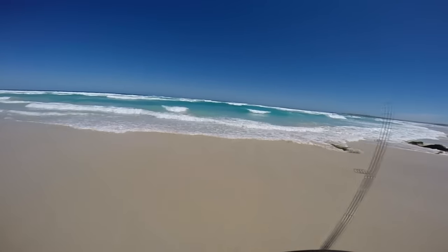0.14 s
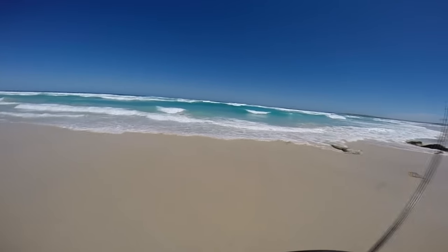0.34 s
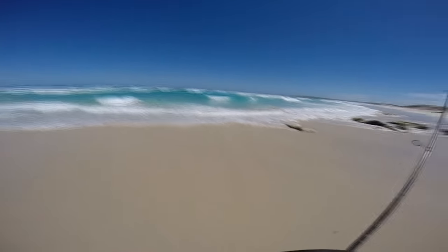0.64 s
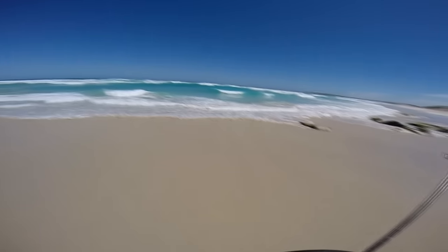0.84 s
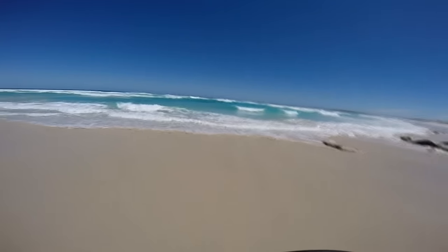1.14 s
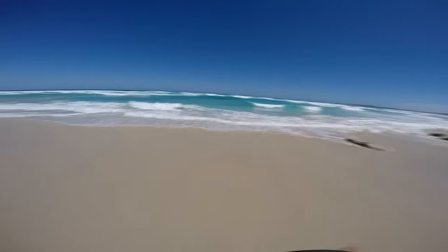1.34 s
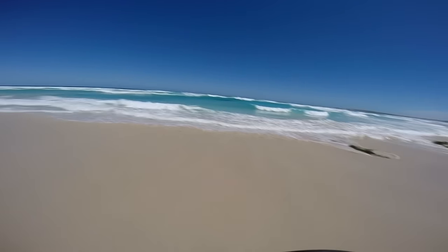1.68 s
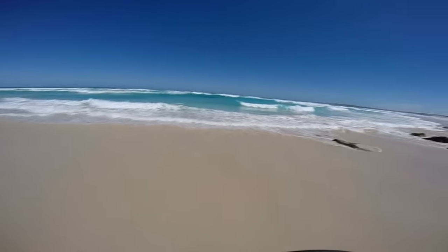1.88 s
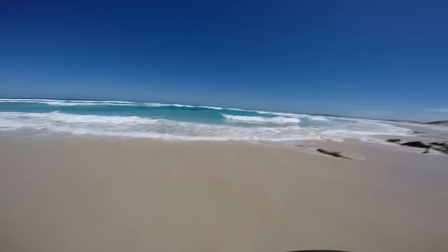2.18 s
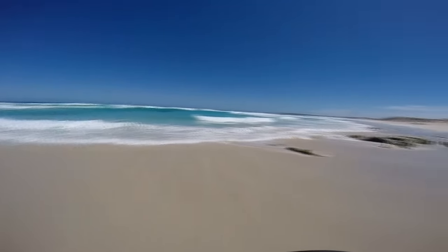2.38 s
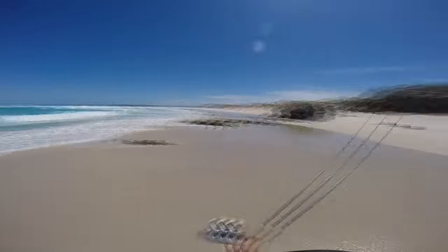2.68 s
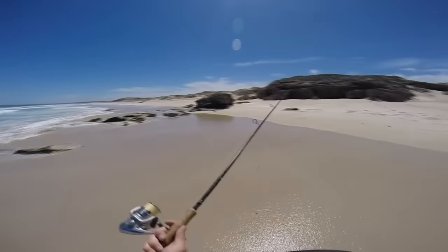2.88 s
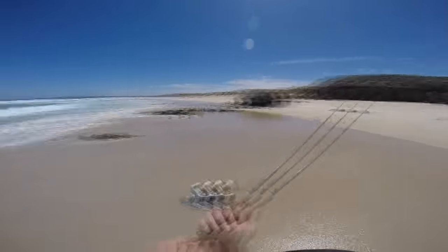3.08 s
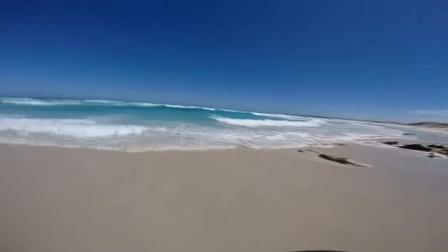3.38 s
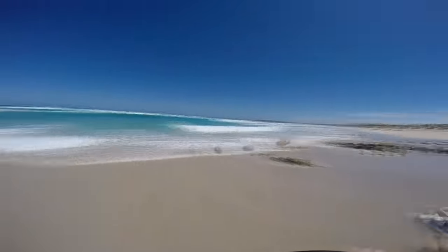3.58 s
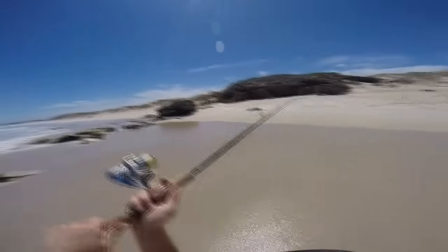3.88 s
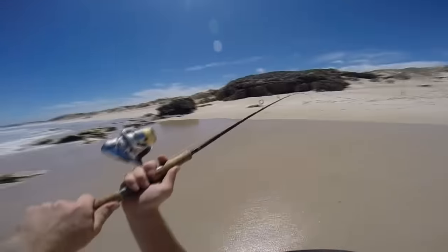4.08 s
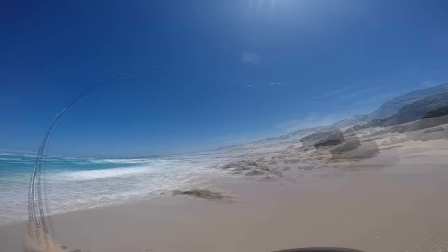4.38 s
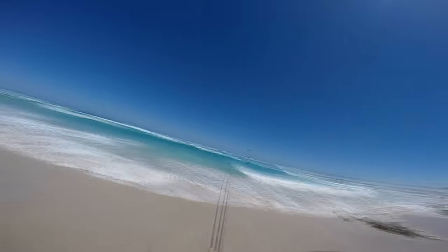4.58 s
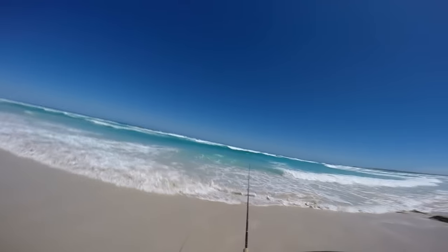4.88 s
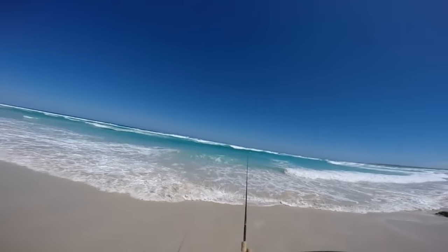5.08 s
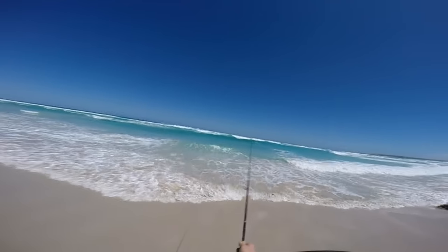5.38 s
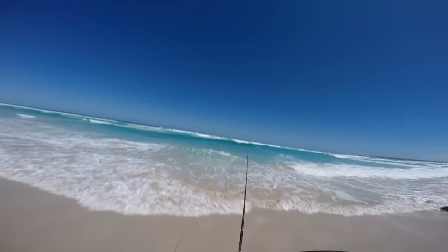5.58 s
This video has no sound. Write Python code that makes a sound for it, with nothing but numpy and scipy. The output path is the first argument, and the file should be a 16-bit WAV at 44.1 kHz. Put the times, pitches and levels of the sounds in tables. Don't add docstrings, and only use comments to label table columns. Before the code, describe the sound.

On an open beach, a head-worn camera in a housing picks up an angler's steps as dull bassy thuds about twice a second, some hard, some soft. Distant surf hisses steadily and faintly. After a quieter gap the rod is cast: a dense burst of deep thumps, hollow housing knocks, a short crackling swish and tiny reel clicks. Surf and light low wind remain.

```python
import sys
import numpy as np
from scipy import signal
from scipy.fft import rfft, irfft, next_fast_len
from scipy.io import wavfile
from scipy.ndimage import uniform_filter1d

SR = 44100
rng = np.random.default_rng(int(sys.argv[2]) if len(sys.argv) > 2 else 0)


def bounce(signal):
    frames = np.transpose(np.atleast_2d(signal))
    limited = np.clip(frames, -1, 1)
    pcm = np.round(limited * 32767).astype(np.int16)
    wavfile.write(sys.argv[1], SR, pcm)


def ratio(d):
    e = np.asarray(d, float) / 20
    return 10 ** e


N = 252604
LOW_CUT_HZ = 20


def colour(x, gain):
    size = next_fast_len(len(x))
    f_hz = np.arange(size // 2 + 1) * SR / size + 1e-3
    return irfft(rfft(x, size) * gain(f_hz), size)[:len(x)]


def unit(x):
    return x / np.sqrt(np.mean(x ** 2))


def band(hz, width_hz, top_hz=20000, grain_db=0):
    grains = rng.standard_normal(N) * ratio(grain_db * rng.exponential(size=N))
    return unit(colour(grains, lambda f: np.exp(-((f - hz) / width_hz) ** 2 * 2) / (1 + (f / top_hz) ** 18)))


def walk(rate_hz):
    hold = int(SR / rate_hz)
    held = np.repeat(rng.standard_normal(N // hold + 1), hold)
    return 1.1 * uniform_filter1d(uniform_filter1d(held, hold), hold)[:N]


def ring(push, hz, t60_s):
    pole = np.exp((2j * np.pi * hz - np.log(1000) / t60_s) / SR)
    return signal.lfilter([1], [1, -pole], push).imag


def add(out, x, start_s, peak_db):
    i = int(start_s * SR)
    out[i:i + len(x)] += (ratio(peak_db) * x / np.max(np.abs(x)))[:N - i]


def jolts(table):
    out, lead_s, bottoms_s = np.zeros(N), 0.04, []
    t = np.arange(SR // 3) / SR - lead_s
    low_cut = signal.butter(3, LOW_CUT_HZ, "high", fs=SR, output="sos")
    for s, db, push_ms, hz, t60_s in table:
        push = np.exp(-(1000 * t / push_ms) ** 2 / 2)
        rock = signal.sosfilt(low_cut, ring(push, hz, t60_s))
        add(out, rock, s - lead_s, db)
        bottoms_s.append(s + t[np.argmin(rock)])
    return out, bottoms_s


def stops(table):
    t, push_ms = np.arange(N) / SR, 2.37
    return -sum(ratio(db) / np.cosh(np.clip(1000 * (t - s) / push_ms, -30, 30)) for s, db in table)


def steps():
    # t/s, peak level/dB, push/ms, mount rock f/Hz, t60/s
    heel_strikes = [
        (0.126, -14.5, 5.4, 36.1, 0.2),
        (0.6607, -19.9, 8.8, 45.3, 0.21),
        (1.182, -5.5, 2.65, 36, 0.16),
        (1.6888, -8, 2.7, 31, 0.21),
        (2.1643, -5, 3, 41.3, 0.12),
        (2.638, -21.5, 6.6, 25.5, 0.18),
        (3.1283, -14, 2.6, 37.9, 0.3),
        (3.6746, -25, 4.9, 33, 0.11),
    ]
    # t/s, peak level/dB, mount rock f/Hz
    shuffles = [(0.1864, -30, 24), (0.712, -29, 24), (0.752, -29, 28), (1.029, -30, 30),
                (1.2592, -24.5, 38.6), (1.7524, -26.5, 39), (2.118, -30, 29.6), (2.243, -29.5, 27.8),
                (2.7231, -39, 38.4), (3.6144, -29.5, 39.6), (4.826, -22.5, 24), (4.898, -25, 24),
                (5.3236, -27.5, 24), (5.3483, -27, 39.7), (5.385, -25.5, 28), (5.418, -32, 35.5)]
    heels, bottoms_s = jolts(heel_strikes)
    stop_db, stop_db_per_ms, hard_push_ms = -8, -2.5, 3.4
    met = []
    for s, (_, db, push_ms, _, _) in zip(bottoms_s, heel_strikes):
        met.append((s, db + stop_db + stop_db_per_ms * (push_ms - hard_push_ms)))
    push_ms, mean_t60_s, mean_hz, stiffening = 5.9, 0.15, 35.2, 2.5
    toes, _ = jolts([(s, db, push_ms, hz, mean_t60_s * (hz / mean_hz) ** stiffening) for s, db, hz in shuffles])
    return heels + stops(met) + toes


def cast():
    # t/s, peak level/dB, mount rock f/Hz, t60/s
    shakes = [(4.3449, -24.5, 36.8, 0.3), (4.3868, -15.3, 24.2, 0.125), (4.4192, -22.9, 34.5, 0.3),
              (4.4783, -14.9, 35.3, 0.3), (4.5184, -10.9, 24.0, 0.05), (4.5463, -9.2, 26.8, 0.3),
              (4.5706, -9.9, 36.3, 0.3), (4.6122, -0.0, 24.0, 0.202), (4.638, -0.5, 24.9, 0.05),
              (4.6841, -15.7, 25.4, 0.215), (4.7096, -14.3, 24.0, 0.063)]
    # t/s, peak level/dB
    whips = [
        (4.5344, -16.5),
        (4.5623, -16),
        (4.6282, -16),
    ]
    push_cycles = 0.195
    shaken, _ = jolts([(s, db, 1000 * push_cycles / hz, hz, t60_s) for s, db, hz, t60_s in shakes])
    return shaken + stops(whips)


def bumps():
    # t/s, peak level/dB, push/ms
    arm_bumps = [
        (4.516, -12, 3.1),
        (4.5726, -10.5, 3.9),
        (4.6186, -8.5, 3),
    ]
    t = np.arange(N) / SR
    return sum(ratio(db) * np.exp(-np.clip(1000 * (t - s) / push_ms, -9, 9) ** 2) for s, db, push_ms in arm_bumps)


def hits(table, push_cycles, scatter, count, order):
    out, t = np.zeros(N), np.arange(SR // 10) / SR
    chances = rng.standard_normal((len(table), count))
    for (s, db, hz, t60_s), chance in zip(table, chances):
        push = np.exp(-(t * hz / push_cycles - 3) ** 2)
        modes = sum(ring(push, hz * (1 + scatter * c), t60_s) for c in chance)
        add(out, np.diff(modes, order), s - 2 * push_cycles / hz, db)
    return out


def gear():
    # t/s, peak level/dB, f/Hz, t60/s
    knocks = [
        (1.190, -24, 305, 0.015),
        (2.169, -32, 264, 0.0085),
        (4.484, -29, 260, 0.033),
        (4.5155, -19, 247, 0.036),
        (4.543, -25.5, 212, 0.045),
        (4.571, -24.5, 260, 0.058),
        (4.6165, -20.5, 278, 0.049),
        (4.671, -29, 274, 0.03),
        (4.708, -33, 250, 0.017),
    ]
    # t/s, peak level/dB, f/Hz, t60/s
    ticks = [(1.1905, -35.5, 1250, .006), (1.1905, -36, 850, 0.0051), (1.1905, -31, 520, 0.0075),
             (2.170, -48, 800, .006), (3.633, -40, 5600, .008), (4.436, -46, 4200, .006),
             (4.4805, -35, 5630, .008), (4.4805, -37, 6900, .008), (4.4805, -35, 3830, .006),
             (4.525, -34.5, 5940, 0.013), (4.539, -42, 6300, 0.014), (4.557, -38.5, 6650, 0.045),
             (4.568, -30, 1200, 0.016), (4.569, -33, 2300, 0.007), (4.670, -36, 2600, 0.0072),
             (4.696, -32, 1930, .015), (4.696, -30, 2760, .01), (4.708, -29.5, 2050, 0.026),
             (4.708, -49, 2700, 0.011), (4.708, -37, 3750, 0.0087), (5.110, -34.5, 2060, .012)]
    knocking = hits(knocks, 0.18, 0.04, count=2, order=0)
    return knocking + hits(ticks, 0.45, 0.045, count=4, order=2)


def swish():
    # t/s, rms level/dB, spread/ms, centre f/Hz
    swishes = [(4.462, -51, 7.3, 2400), (4.48, -41.5, 5.8, 1900), (4.505, -41, 5, 2090),
               (4.525, -36.5, 3.5, 2200), (4.532, -32, 1.6, 1830), (4.537, -34, 4.7, 2940),
               (4.553, -33.5, 4.1, 2500), (4.58, -33.5, 3.5, 1810), (4.587, -28.5, 3.3, 1900),
               (4.597, -26, 3.3, 2200), (4.612, -35.5, 4.7, 2020), (4.64, -50, 16, 1770),
               (4.704, -44, 4.1, 2570)]
    out, gusts, t = 0, 0, np.arange(N) / SR
    for s, db, spread_ms, hz in swishes:
        gust = np.exp(-(1000 * (t - s) / spread_ms) ** 2 / 2)
        crackle = gust * band(hz, 0.82 * hz, top_hz=3290, grain_db=2.5)
        out = out + ratio(db) * crackle * np.sqrt(np.sum(gust ** 2) / np.sum(crackle ** 2))
        gusts = gusts + ratio(db) * gust
    whistle = ratio(-34) * band(9900, 1100)
    rustle = ratio(-21.5) * band(5050, 1900)
    grit = ratio(-27.5) * band(9000, 9000, grain_db=4.0)
    return out + gusts * (whistle + rustle + grit)


def surf():
    # t/s, swell level/dB, head turned from the sea/0-1
    swells = [(0.0, 0.5, .05), (0.39, 2, 0.43), (0.65, -0.5, 0.4), (0.94, 0.4, 0.63), (1.54, 0, 0.26),
              (2.02, 1, 0.37), (2.5, 3, 0.2), (2.94, 2, 0.9), (3.21, 4.5, 0.95), (3.55, 6, 0.16),
              (3.91, 3, .9), (4.2, -0.6, 0.84), (4.4, 4, 0.8), (4.78, 5.5, 0.2), (5.038, 6.5, 0.15),
              (5.3, 3, .02), (5.728, -0.5, .02)]
    layer_hz = (900, 1630, 2900, 5200, 8000)
    swell_share = (.01, 0.61, .3, 0.7, 0.43)
    turn_db = (0.9, 7, 1.9, -4.5, -1.6)
    # f/Hz, level per Hz/dB
    surf_colour = [(60, 8), (150, 4), (300, 2), (600, -4), (1000, -5.5), (2000, -6.5), (4000, -11),
                   (5900, -19.5), (7800, -23), (12000, -30), (15300, -31)]
    # f/Hz, width/Hz, level/dB
    cavities = [(1623, 344, 8.5), (2563, 420, 5.5), (3120, 84, 4), (3596, 205, 6.5), (4570, 380, 3.5),
                (5290, 580, 5.5), (6224, 250, 6.5), (6900, 750, 9.5), (10270, 970, 3.5)]
    colour_hz, colour_db = np.transpose(surf_colour)

    def heard(f):
        open_db = np.interp(np.log(f), np.log(colour_hz), colour_db)
        return ratio(open_db + sum(db * np.exp(-((f - hz) / width_hz) ** 2 * 2) for hz, width_hz, db in cavities))

    bubbles = unit(rng.standard_normal(N) * ratio(1.73 * rng.exponential(size=N)))
    far = unit(colour(bubbles * ratio(0.34 * walk(20)), heard))
    s, swell_db, turned = np.transpose(swells)
    levels_db = np.outer(swell_share, swell_db) + np.outer(turn_db, turned)
    levels_db = levels_db - levels_db.mean(axis=1)[:, None]
    out, step_oct, t = 0, 1 / 3, np.arange(N) / SR
    for centre_hz in 40.4 * 2 ** np.arange(0, 9, step_oct):
        part = colour(far, lambda f: np.clip(1 - np.abs(np.log2(f / centre_hz)) / step_oct, 0, 1))
        change_db = [np.interp(np.log(centre_hz), np.log(layer_hz), row) for row in levels_db.T]
        out = out + part * ratio(np.interp(t, s, change_db) + 1.03 * walk(9))
    return ratio(-47.0) * out


def breeze():
    # t/s, level/dB
    gusts = [(.02, -45.5), (.3, -44), (.58, -47.5), (1.0, -47), (1.38, -47.5), (1.58, -48), (1.96, -50),
             (2.3, -52), (2.65, -41), (3.02, -44), (3.36, -43.5), (3.72, -39), (4.05, -43.5), (4.32, -39),
             (4.6, -33), (5.02, -43), (5.3, -44), (5.62, -45)]
    t, calm_db, spread_s = np.arange(N) / SR, -55, 0.088
    strength = ratio(calm_db) + sum(ratio(db) * np.exp(-((t - s) / spread_s) ** 2 / 2) for s, db in gusts)
    eddies = colour(rng.standard_normal(N),
                    lambda f: f ** 3 / (f ** 3 + LOW_CUT_HZ ** 3) / (1 + (f / 42) ** 4.2))
    return unit(eddies) * strength * ratio(3.1 * walk(18))


def scene():
    return (steps() + cast() + bumps() + gear() + swish() + surf() + breeze())[None]


def top_cut(x):
    return signal.sosfilt(signal.butter(12, 15610, fs=SR, output="sos"), x)


def record(dry):
    # f/Hz, share of the time/0-1
    dropped = [(12300, 0), (13200, .2), (14000, .4), (15200, .5), (15330, 1)]
    hz, _, frames = signal.stft(dry[0], SR, nperseg=1024)
    strip_bins, hold_frames = 3, 4
    luck = rng.standard_normal((len(hz) // strip_bins + 1, frames.shape[1]))
    luck = uniform_filter1d(luck, size=hold_frames, axis=1)
    luck = luck.argsort(axis=1).argsort(axis=1) / luck.shape[1]
    luck = np.repeat(luck, strip_bins, axis=0)[:len(hz)]
    loud_db = 20 * np.log10(uniform_filter1d(np.abs(frames).max(axis=0), size=7) + 1e-9)
    starved = 0.25 * np.outer(np.interp(hz, (11500, 13500), (0, 1)), np.interp(loud_db, (-30, -18), (0, 1)))
    kept = luck >= np.interp(hz, *np.transpose(dropped))[:, None] + starved
    mix = signal.istft(frames * kept, SR, nperseg=1024)[1][None, :N]
    return top_cut(mix)


dry = scene()
out = record(dry)
bounce(out)
```